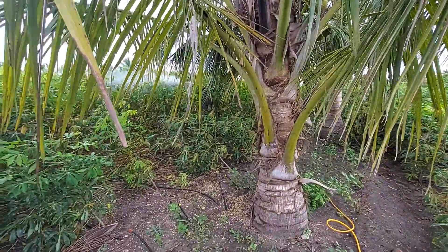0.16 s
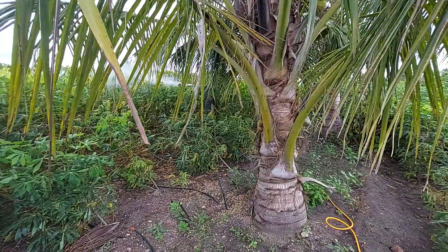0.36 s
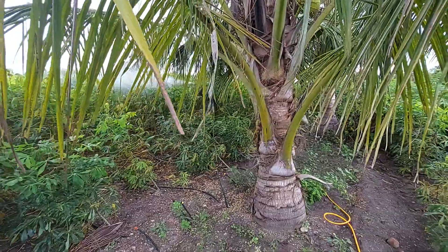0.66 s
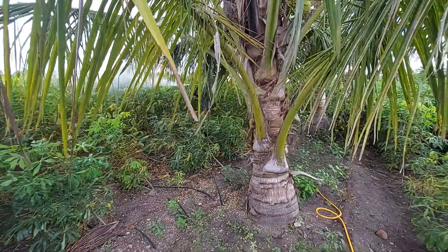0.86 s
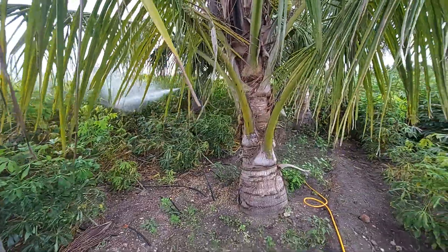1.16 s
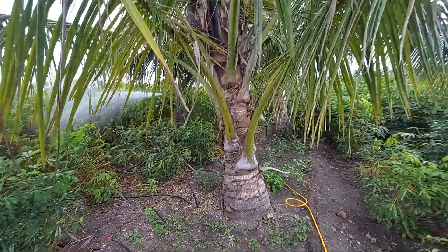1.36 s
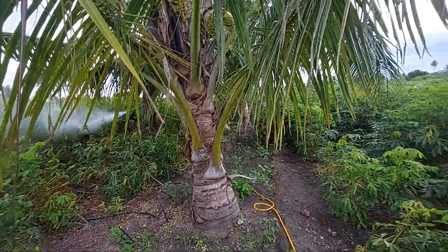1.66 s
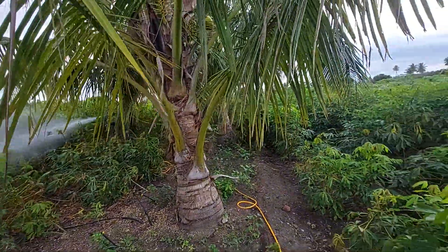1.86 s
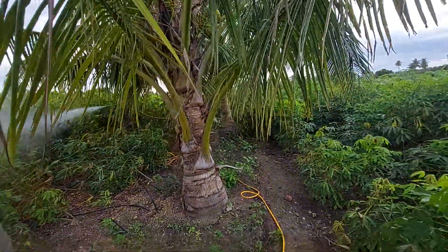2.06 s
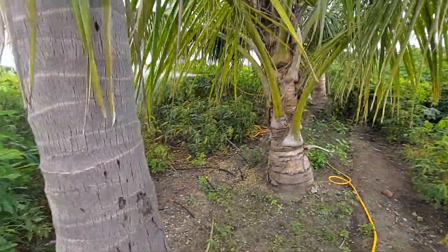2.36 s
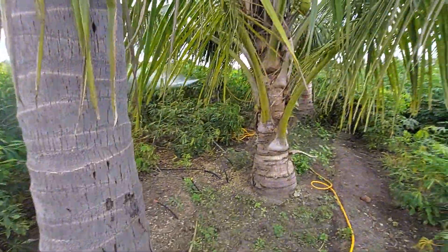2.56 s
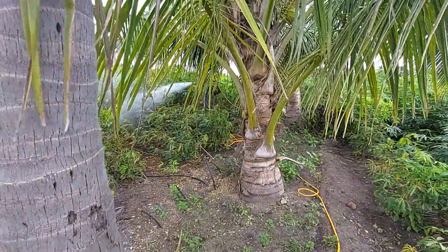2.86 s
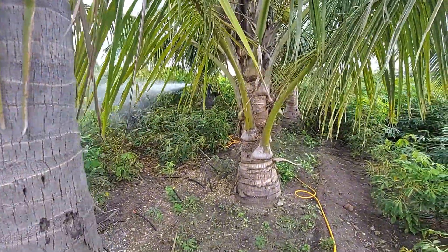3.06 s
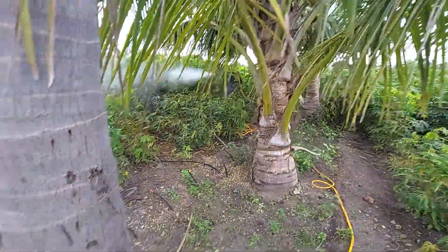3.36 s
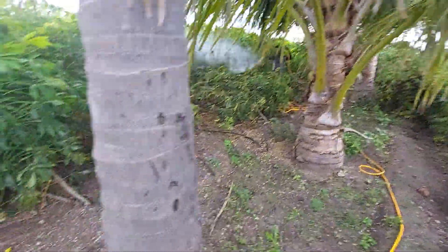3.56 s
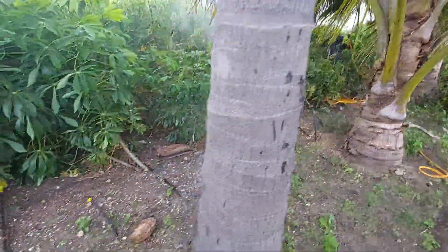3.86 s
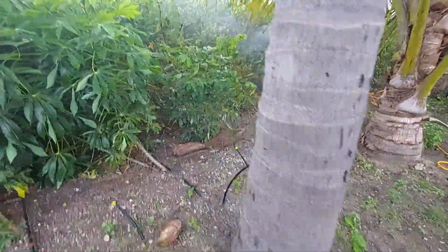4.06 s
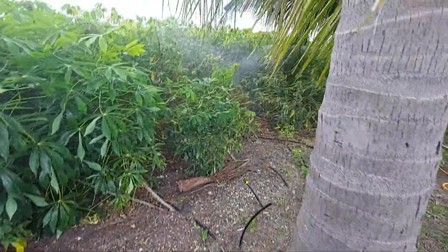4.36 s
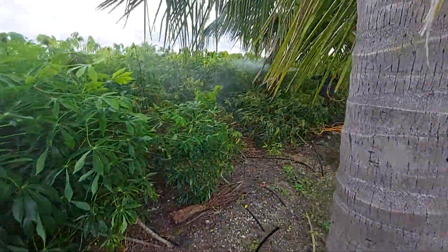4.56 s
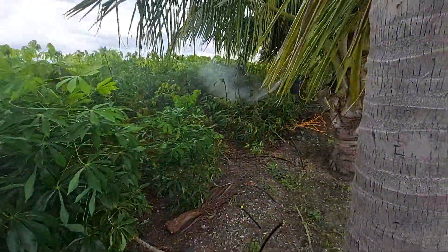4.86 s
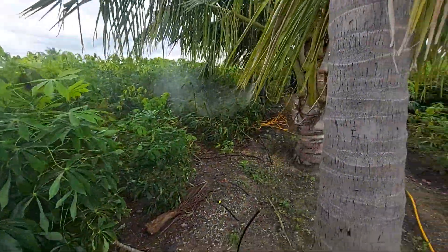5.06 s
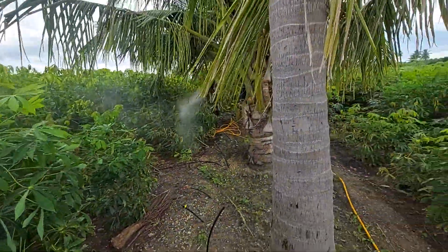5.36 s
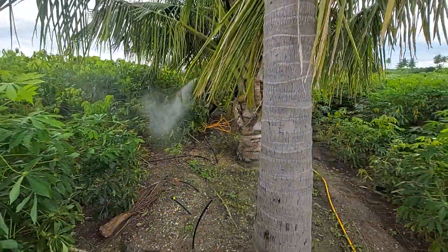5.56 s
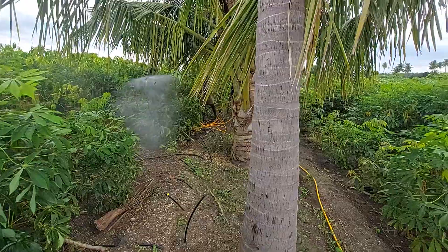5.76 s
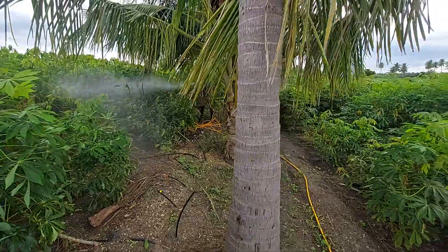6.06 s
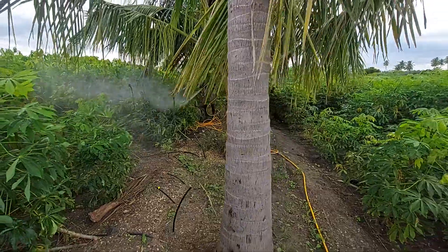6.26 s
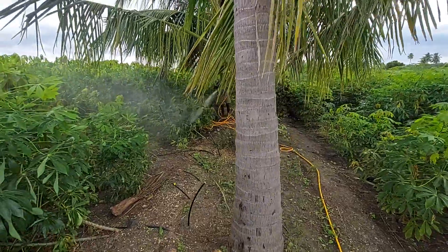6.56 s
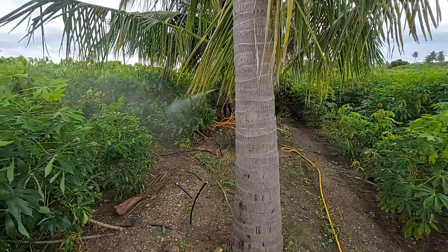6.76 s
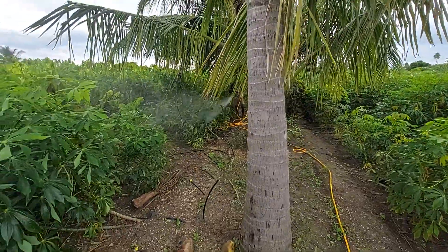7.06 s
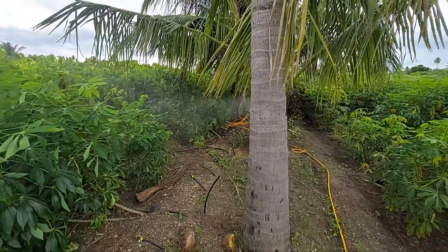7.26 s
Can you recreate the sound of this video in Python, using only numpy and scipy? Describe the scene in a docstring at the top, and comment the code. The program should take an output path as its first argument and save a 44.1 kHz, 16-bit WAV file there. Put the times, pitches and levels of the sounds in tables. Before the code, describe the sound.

A spray lance hisses steadily over the low thudding drone of a distant pump engine, with a few close leaf brushes and faint chirps.

```python
"""A single-cylinder engine thuds far across a field, under the hiss of a spray lance.
Each firing rings the silencer; the engine's pump drives a jet that breaks into mist.
The microphone is on a walking camera, and palm leaflets catch and slide close beside it.
Faint behind them, a small bird repeats a falling chirp."""
import sys
import numpy as np
from scipy import signal
from scipy.fft import rfft, irfft, next_fast_len
from scipy.io import wavfile
from scipy.ndimage import uniform_filter1d, map_coordinates

SR = 44100
rng = np.random.default_rng(int(sys.argv[2]) if len(sys.argv) > 2 else 0)


def wav_record(signal):
    """Record a signal, one row per channel, as 16-bit PCM in the file named by sys.argv[1]."""
    frames = np.transpose(np.atleast_2d(signal))
    bounded = np.clip(frames, -1, 1)
    # unit amplitude maps onto the largest positive 16-bit level
    quanta = np.round(bounded * 32767).astype(np.int16)
    wavfile.write(sys.argv[1], SR, quanta)


N = 326340

# distant engine, held nearly steady by its governor: t/s, firing rate/Hz
FIRING_RATE = [(2.8, 20.66), (3.7, 20.7), (5.5, 20.71), (6.4, 20.65)]
# exhaust pipe and silencer, one after the other: f/Hz, width/Hz
SILENCER_MODES = [(62.8, 6.06), (92, 9.5), (121.7, 56)]
# exhaust thud at the walking microphone: t/s, level/dB
THUD_LEVEL = [(0, -33), (3.5, -32.5), (4.5, -33.5), (6.3, -32), (7.4, -32.5)]
# engine casing and pump: f/Hz, relative density/dB
CLATTER_SPECTRUM = [(120, -2.5), (190, 1), (240, -5), (315, -1.5), (450, -7.5), (580, -4), (760, -4.5),
                    (1000, -7), (1200, -4.5), (1400, -2.5), (1580, -6), (1900, -8.5), (3000, -28.5),
                    (6000, -45)]
# casing noise at the microphone: t/s, level/dB, f/Hz of its hollow colour
CASING_AT_MIC = [(0, -44, 780), (1.1, -43, 800), (2, -43, 1020), (2.6, -44.5, 850), (3.7, -43.5, 920),
                 (4.5, -45.3, 740), (5.4, -42.5, 630), (6.3, -42.5, 690), (7.4, -45, 745)]
# open-air rumble: f/Hz, relative density/dB
RUMBLE_SPECTRUM = [(15, -36), (28, -23), (40, -0.5), (55, 3.5), (110, -4), (170, -8.5), (250, -28),
                   (500, -41)]
# jet leaving the nozzle: f/Hz, relative density/dB
JET_SPECTRUM = [(700, -20.5), (1500, -23), (2100, -8), (2800, -4.5), (3500, -3.5), (4500, -2), (5500, -1),
                (6650, 1.5), (8300, -3), (10500, -0.5), (13000, -4), (15800, -6)]
# lance swinging towards the microphone and away: t/s, hiss level/dB, low rush level/dB
LANCE_SWING = [(.2, -38.5, -42.5), (1.1, -36.5, -42), (1.5, -37.5, -45), (2.33, -39.3, -44.5),
               (2.65, -36, -42.8), (3.2, -39.5, -43), (3.65, -36, -42.5), (3.95, -36.7, -44),
               (4.18, -42.7, -49.5), (4.52, -41, -41.5), (4.8, -38.5, -47.5), (5.1, -35.5, -42.5),
               (5.3, -39, -42), (5.55, -37, -43), (5.85, -39.5, -43), (6.6, -36.5, -44.5), (7.17, -40, -45),
               (7.4, -45, -51.5)]
# leaflets at the microphone: t/s, length/s, level/dB, bite (0 grazing tip, 1 hard scrape)
LEAF_STROKES = [(0, 0.025, -25.5, 0.33), (0.389, .006, -26.5, 0.17), (.403, 0.039, -32, 0.23),
                (3.283, .04, -26, 0.94), (3.313, 0.033, -23, .9), (3.432, 0.013, -22.5, 0.95),
                (3.466, .012, -31.5, 0.92), (3.509, .011, -27, 0.55), (3.538, .022, -29, .35),
                (3.565, 0.026, -21.5, 0.54), (3.76, .014, -28.5, .12), (3.796, 0.052, -31, 0.2),
                (3.866, .04, -26, 0), (6.304, 0.062, -36, 0), (6.38, .022, -33.5, .45),
                (6.499, 0.04, -32, 0.1), (6.697, 0.061, -31, 0.3), (6.95, 0.066, -34.5, 0.14),
                (7.015, .045, -32, 0.17)]
# a leaflet sliding, pressed hard, and grazing with its tip: f/Hz, relative density/dB
SWISH_SPECTRUM = [(2500, -26.5), (4500, -9), (6200, 1), (7500, -4), (9000, -7.5), (12000, -10.5),
                  (15800, -16)]
SCRAPE_SPECTRUM = [(200, -35), (450, -16), (800, -9), (1400, -8), (2000, -10), (2700, -1), (3400, -3),
                   (4200, 1.5), (5200, -4.5), (7000, -8), (9000, -29)]
TIP_SPECTRUM = [(5000, -23), (7500, -8), (9000, 1), (11200, 1), (12500, -2.5), (15800, -4.5)]
# the bird's calls: t/s, level/dB
BIRD_CALLS = [(.378, -46), (.712, -45), (1.042, -46.5), (4.031, -44), (4.352, -46), (4.678, -47),
              (5.085, -47), (6.584, -40), (6.88, -40), (7.205, -43)]
# the microphone's two ports: f/Hz, left minus right/dB
PORT_BALANCE = [(60, -1), (400, 0), (800, 1), (1300, 4), (2000, 1), (2800, -2), (4200, -6.5), (5200, -13),
                (6300, -18), (7500, -6), (8700, -8), (10500, -3.5), (15000, 0)]
# likeness of the sound at the two ports: f/Hz, correlation
PORT_LIKENESS = [(35, .8), (90, 0.34), (200, 0.9), (380, 0.84), (700, 0.48), (1300, 0), (4000, 0.18),
                 (15000, 0)]


def amp(db):
    """Decibels to gain."""
    return 10 ** (np.asarray(db) / 20)


def unit(x):
    """Scale to rms 1."""
    return x / np.sqrt(np.mean(x ** 2) + 1e-20)


def along(points, hz):
    """Read (f/Hz, value) points on a log frequency axis."""
    f, values = np.transpose(points)
    return np.interp(np.log(hz + 1), np.log(f + 1), values)


def curves(rows):
    """One value per sample for each column after the time."""
    times, *columns = np.transpose(rows)
    return [np.interp(np.arange(N) / SR, times, column) for column in columns]


def wobble(rate):
    """A smooth random curve, rate knots a second."""
    return map_coordinates(rng.standard_normal(int(N * rate / SR) + 4), [np.arange(N) * rate / SR])


def filtered(x, response):
    """Pass x through a complex frequency response."""
    size = next_fast_len(x.shape[-1] + SR // 2)
    return irfft(rfft(x, size) * response(np.fft.rfftfreq(size, 1 / SR)), size)[..., :x.shape[-1]]


def resonance(f, hz, width):
    """A causal band-pass with gain 1 at its centre."""
    return 1j * f * width / (hz * hz - f * f + 1j * f * width)


def port_gains(hz):
    """Left and right microphone gains that share a constant power."""
    ratio = amp(along(PORT_BALANCE, hz))
    return np.array([ratio, np.ones_like(ratio)]) / np.sqrt(1 + ratio ** 2)


def rush(spectrum, patchy_db):
    """Stereo noise of rms 1 with drifting patches of gain, as the two ports hear it."""
    bins = signal.stft(rng.standard_normal((2, N)), nperseg=512)[2]
    patches = rng.standard_normal(bins.shape)
    for _ in range(2):
        patches = uniform_filter1d(uniform_filter1d(patches, size=11, axis=1), size=36, axis=2)
    pair = signal.istft(bins * amp(patchy_db * unit(patches)), nperseg=512)[1][:, :N]
    spread = lambda f: np.arccos(np.clip(along(PORT_LIKENESS, f), -1, 1)) / 2
    mid, side = filtered(pair, lambda f: amp(along(spectrum, f)) * [np.cos(spread(f)), np.sin(spread(f))])
    return unit(filtered(np.array([mid + side, mid - side]), port_gains))


def bounce(x, delay_s, share, drift):
    """Add a reflection off ground or trunk; its delay drifts at each port as the microphone moves."""
    n = np.arange(N)
    echo = np.array([np.interp(n - SR * delay_s * (1 + drift * wobble(1.2)), n, side) for side in x])
    return (x + share * echo) / np.sqrt(1 + share ** 2)


def crop_scatter(x, t60, db):
    """Add the short tail that the crop scatters to each port."""
    t = np.arange(SR // 4) / SR
    tail = rng.standard_normal((2, len(t))) * amp(-60 * t / t60)
    return x + amp(db) * np.std(x) * unit(signal.fftconvolve(x[None], tail, axes=1)[:, :len(x)])


def crank(lag_cycles=.325, drag_cycles=.016):
    """Engine cycles, from one second before the start; the pump drags once in six firings."""
    rate = np.pad(curves(FIRING_RATE)[0], (SR, 0), mode="edge")
    cycles = np.cumsum(rate) / SR
    cycles = cycles - cycles[SR] - lag_cycles
    return cycles - drag_cycles * np.cos(2 * np.pi * (cycles + 1) / 6)


def exhaust(cycles, uneven_db=.44, upper_db=-21, lower_db=-17):
    """Far off, one puff per firing rings the silencer, and more faintly two modes of the pipe."""
    firings = np.flatnonzero(np.diff(np.floor(cycles)) > 0)
    puffs = np.zeros(len(cycles))
    puffs[firings] = amp(uneven_db * rng.standard_normal(len(firings)))
    thud = filtered(puffs, lambda f: np.prod([resonance(f, *mode) for mode in SILENCER_MODES], axis=0))
    upper_mode = filtered(puffs, lambda f: resonance(f, hz=165.4, width=17) ** 2)
    lower_mode = filtered(puffs, lambda f: -resonance(f, hz=122.6, width=23) ** 2)
    beats = unit(thud) + amp(upper_db) * unit(upper_mode) + amp(lower_db) * unit(lower_mode)
    lean_right = amp([[-.4], [.4]])
    return amp(curves(THUD_LEVEL)[0]) * crop_scatter(beats, t60=.074, db=-20)[:, SR:] * lean_right


def casing(cycles, swell_db=1, hollow_db=4, hollow_octaves=.2):
    """The distant casing and pump clatter with a shifting hollow colour, swelling once a cycle."""
    hz, times, bins = signal.stft(rush(CLATTER_SPECTRUM, patchy_db=1), SR, nperseg=1024)
    level_db, centre_hz = curves(CASING_AT_MIC)
    octaves_off = np.log2((hz[:, None] + 1) / np.interp(times, np.arange(N) / SR, centre_hz))
    hollow = amp(hollow_db * np.exp(-(octaves_off / hollow_octaves) ** 2))
    clatter = signal.istft(bins * hollow, SR, nperseg=1024)[1][:, :N]
    swell = swell_db * np.cos(2 * np.pi * (cycles[SR:] - .4))
    return amp(level_db + swell) * bounce(clatter, delay_s=.009, share=.16, drift=.058)


def open_air(rumble_db=-45, breeze_db=-55):
    """The open field rumbles, and light air moves over each port on its own."""
    rumble = rush(RUMBLE_SPECTRUM, patchy_db=1)
    breeze = unit(filtered(rng.standard_normal((2, N)), lambda f: amp(along(RUMBLE_SPECTRUM, f))))
    return amp(rumble_db + wobble(8.7)) * rumble + amp(breeze_db) * breeze


def spray(cycles, surge_db=.15, flutter_db=.73, spatter_db=.7):
    """The jet surges with the pump and breaks into droplets; hiss and fizz swell as the lance turns."""
    jet = bounce(rush(JET_SPECTRUM, patchy_db=1.48), delay_s=.005, share=.25, drift=.154)
    below = lambda edge_hz: filtered(jet, lambda f: 1 / (1 + (f / edge_hz) ** 12))
    low_rush = below(4650)
    hiss = below(8530) - low_rush
    fizz = jet - low_rush - hiss
    aim_db, low_db = curves(LANCE_SWING)
    treble = amp(aim_db - .5) * unit(hiss) + amp(aim_db + .5) * unit(fizz)
    mist = amp(low_db - .5) * unit(low_rush) + treble
    pump_stroke = np.cos(2 * np.pi * cycles[SR:] / 3)  # one in three firings
    droplets = unit(amp(spatter_db * wobble(1500)))
    return mist * droplets * amp(surge_db * pump_stroke + flutter_db * wobble(35))


def leaves(grain_db=2.5, clump_db=1.25, rise_share=.26, fade_s=.035, release_s=.02):
    """Close up, stiff leaflets slide in fine stick-slip grains; a harder bite scrapes lower."""
    t = np.arange(N) / SR
    spectra = SWISH_SPECTRUM, SCRAPE_SPECTRUM, TIP_SPECTRUM
    powers = np.zeros((3, N))
    for peak_s, length, db, bite in LEAF_STROKES:
        attack = np.maximum(peak_s - t, 0) / (rise_share * length)
        easing = np.maximum(t - peak_s, 0) / (fade_s + length)
        release = np.maximum(t - peak_s - .8 * length, 0) / release_s
        envelope = np.exp(-np.minimum(attack + easing + release, 20))
        scrape_db = db - 16.5 + 20.5 * bite
        tip_db = db + 1 - 13.5 * bite
        powers += np.outer(amp([db, scrape_db, tip_db]), envelope) ** 2
    grains = unit(amp(grain_db * wobble(1800) + clump_db * wobble(200)))
    rub = sum(np.sqrt(power) * rush(spectrum, patchy_db=1.5) for power, spectrum in zip(powers, spectra))
    return bounce(grains * rub, delay_s=.0026, share=.26, drift=.052)


def bird(high_hz=3320, low_hz=2100, note_s=.037, lead_hz=4200, lead_rise=.1, lead_db=-6.5):
    """Faint through the crop, each call is a thin rising note and then a quick downward slur."""
    t = np.arange(N) / SR
    song = np.zeros(N)
    for (call_s, db), (tune, gap) in zip(BIRD_CALLS, rng.standard_normal((len(BIRD_CALLS), 2))):
        near = np.abs(t - call_s) < .1
        since = t[near] - call_s
        slur_progress = np.clip(since / note_s + .12, 0, 1)
        lead_progress = np.clip((since + .036 + .0074 * gap) / note_s + .5, 0, 1)
        slur_pitch = high_hz * (low_hz / high_hz) ** slur_progress * (1 + .011 * tune)
        lead_pitch = lead_hz * (1 + lead_rise * (lead_progress - .5) + .018 * tune)
        slur = np.sin(np.pi * slur_progress) * np.sin(2 * np.pi * np.cumsum(slur_pitch) / SR)
        lead = np.sin(np.pi * lead_progress) * np.sin(2 * np.pi * np.cumsum(lead_pitch) / SR)
        song[near] += np.sqrt(2) * amp(db) * (slur + amp(lead_db) * lead)
    return crop_scatter(song, t60=.17, db=-1)


def scene():
    """The field from the walking microphone; engine, pump and spray share one crankshaft."""
    cycles = crank()
    return exhaust(cycles) + casing(cycles) + open_air() + spray(cycles) + leaves() + bird()


def record(dry):
    """The camera keeps nothing above 16 kHz."""
    return filtered(dry, lambda hz: hz < 16000)


dry = scene()
out = record(dry)
wav_record(out)
```